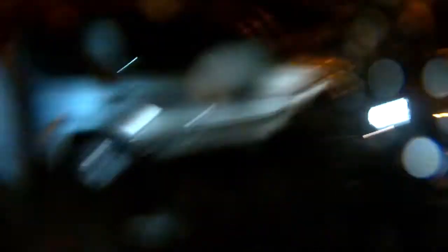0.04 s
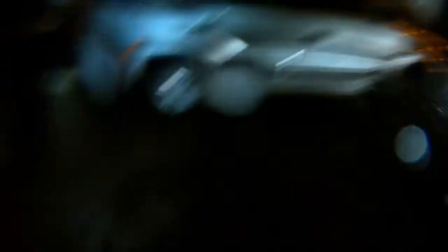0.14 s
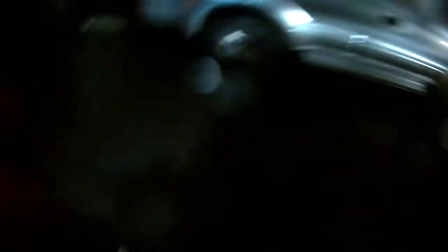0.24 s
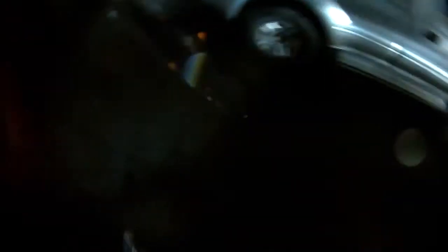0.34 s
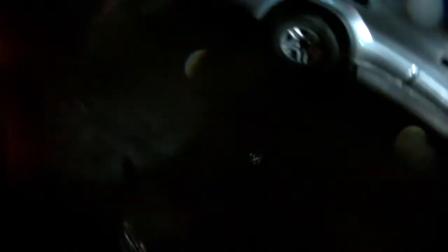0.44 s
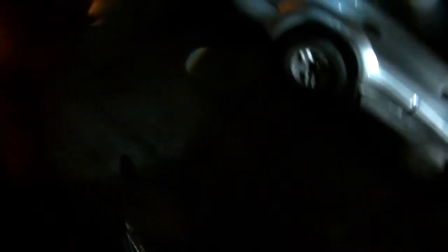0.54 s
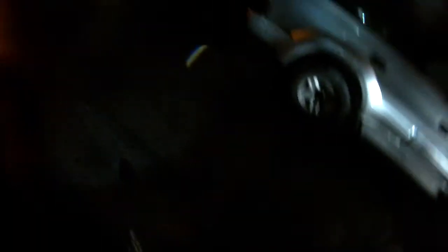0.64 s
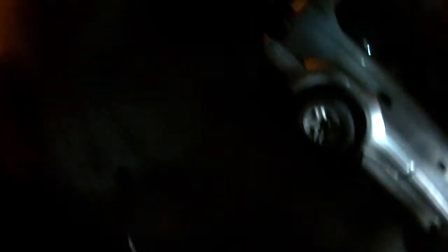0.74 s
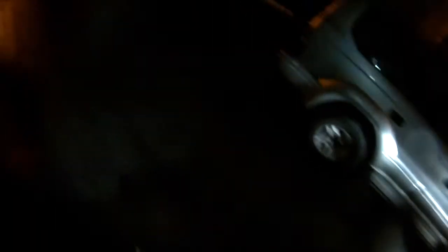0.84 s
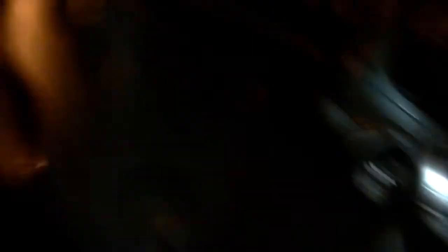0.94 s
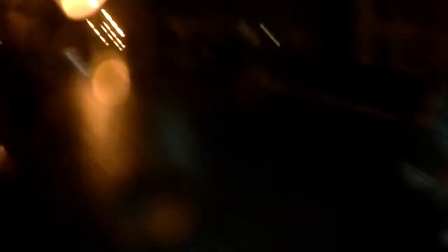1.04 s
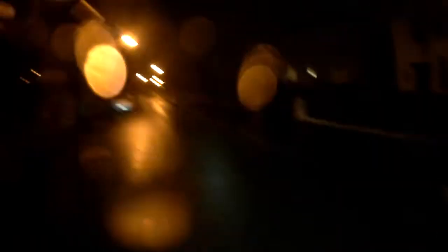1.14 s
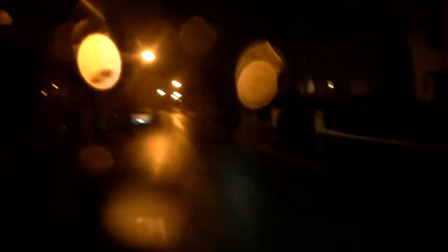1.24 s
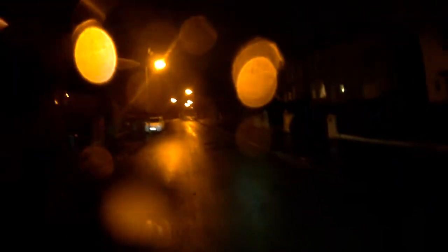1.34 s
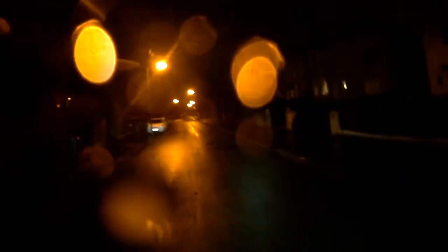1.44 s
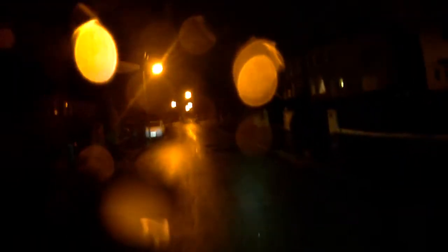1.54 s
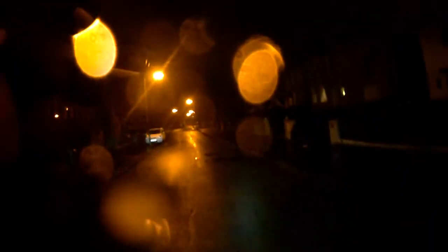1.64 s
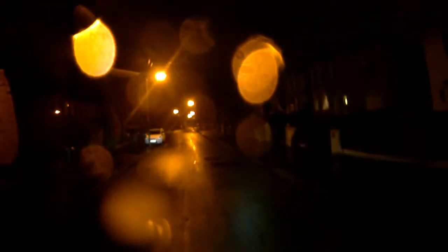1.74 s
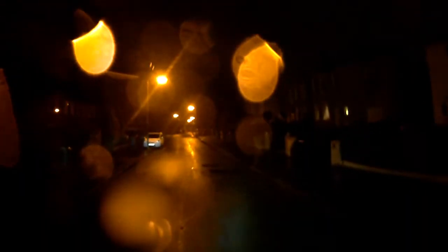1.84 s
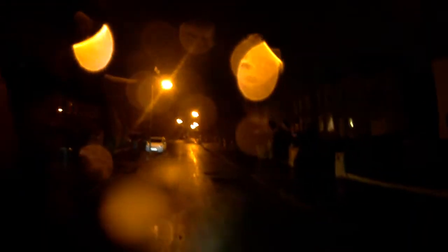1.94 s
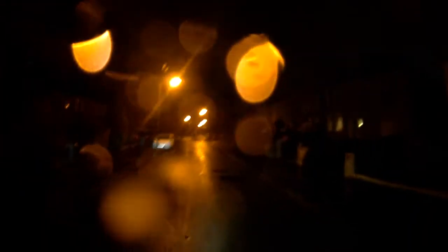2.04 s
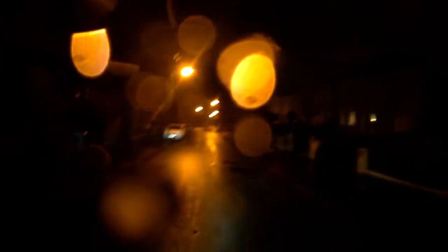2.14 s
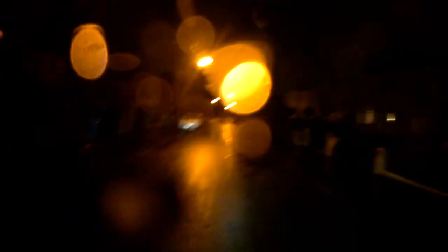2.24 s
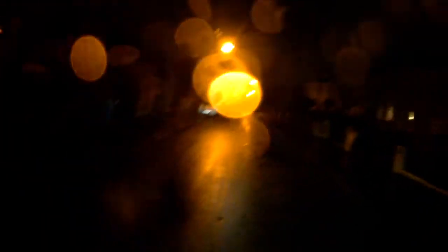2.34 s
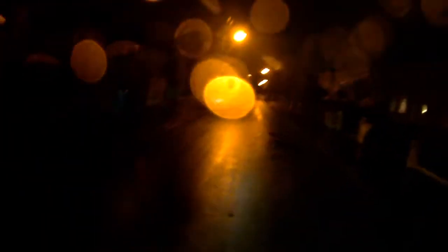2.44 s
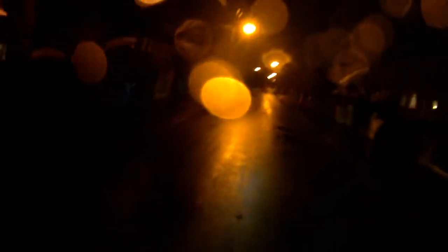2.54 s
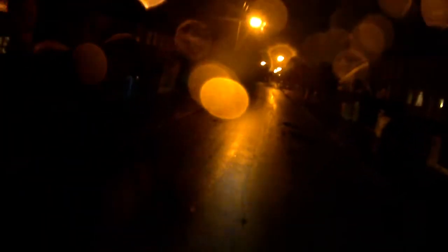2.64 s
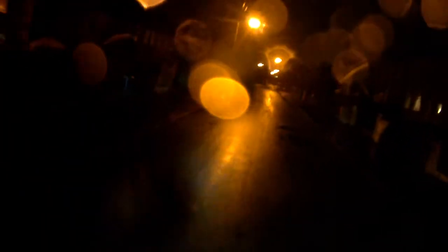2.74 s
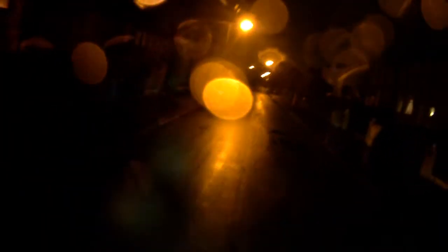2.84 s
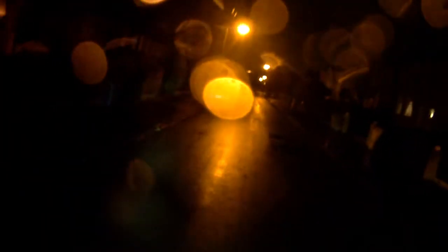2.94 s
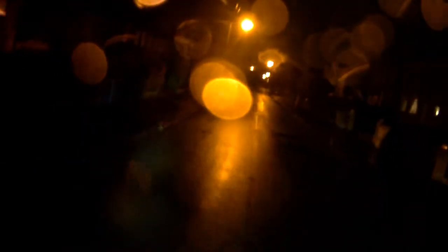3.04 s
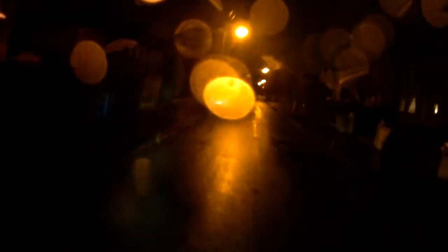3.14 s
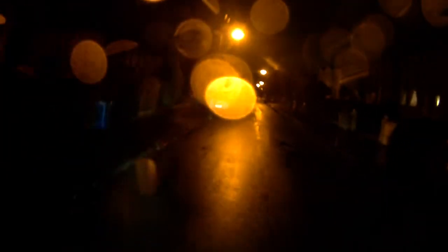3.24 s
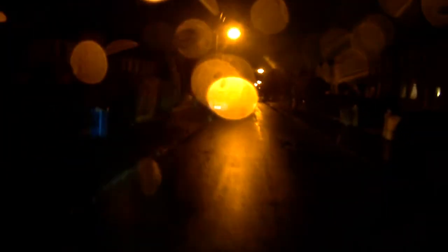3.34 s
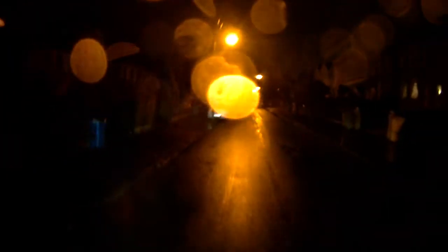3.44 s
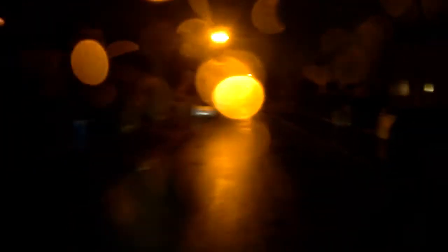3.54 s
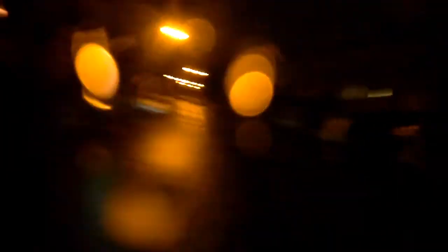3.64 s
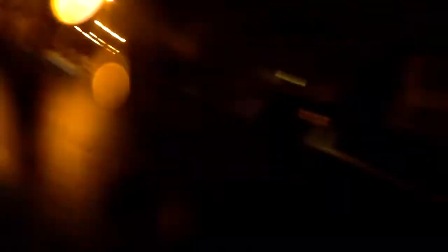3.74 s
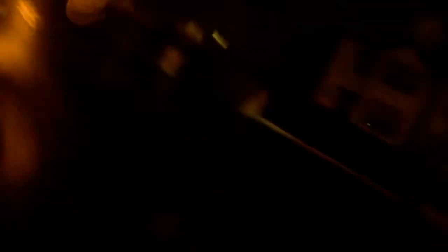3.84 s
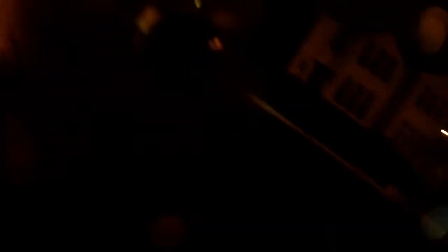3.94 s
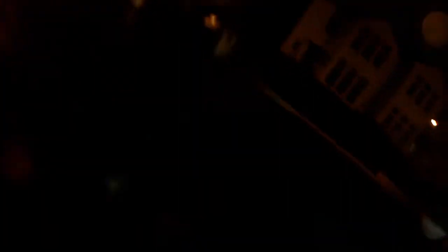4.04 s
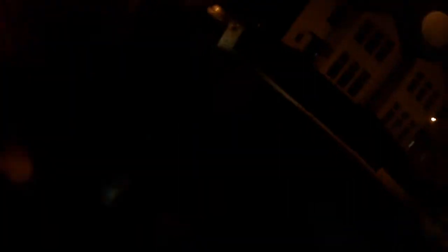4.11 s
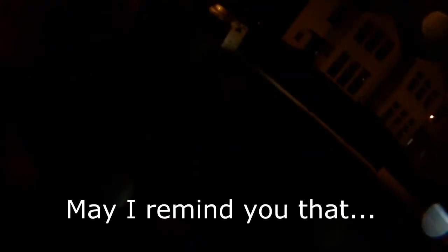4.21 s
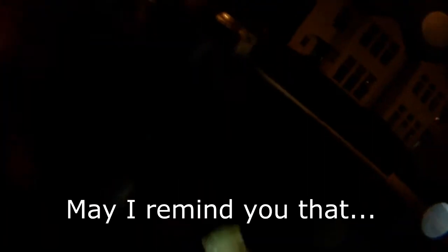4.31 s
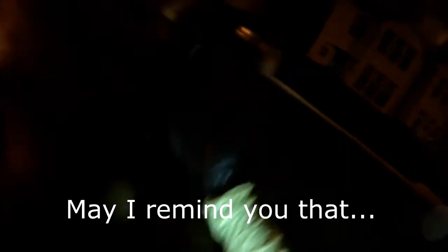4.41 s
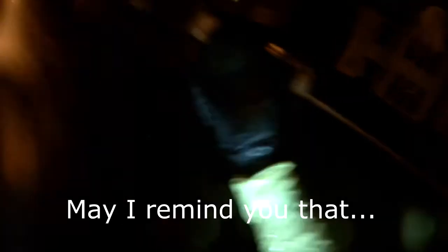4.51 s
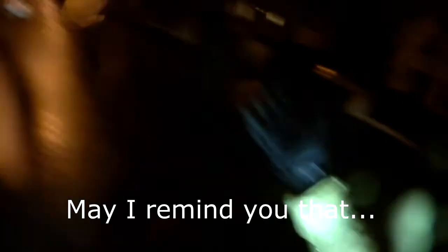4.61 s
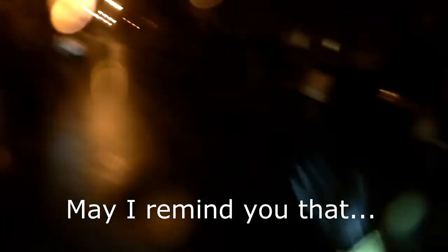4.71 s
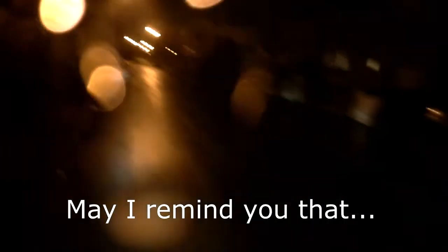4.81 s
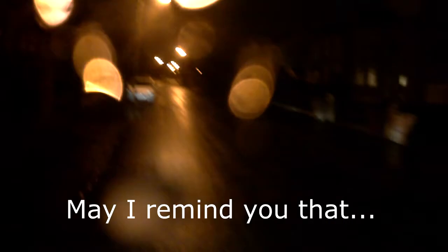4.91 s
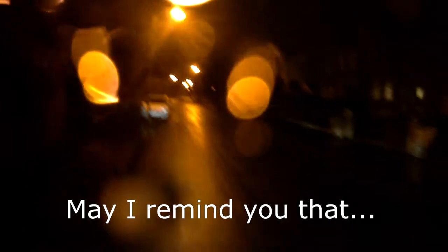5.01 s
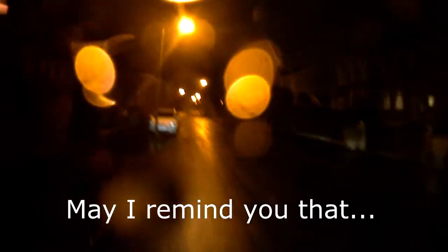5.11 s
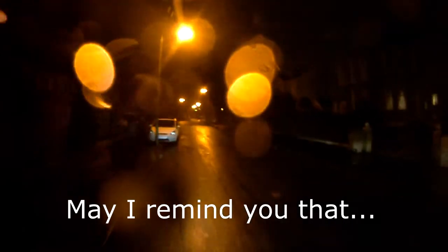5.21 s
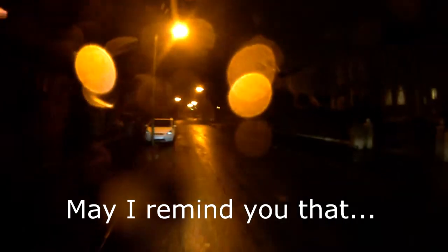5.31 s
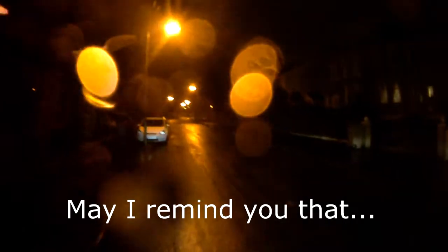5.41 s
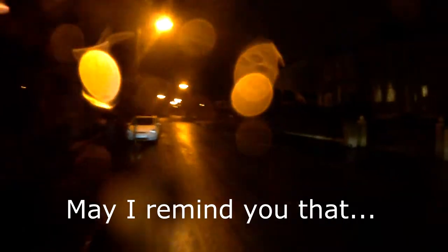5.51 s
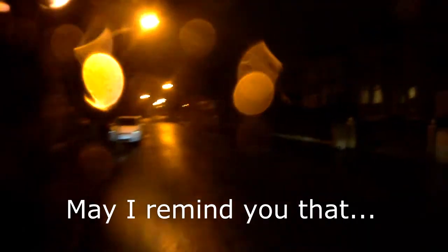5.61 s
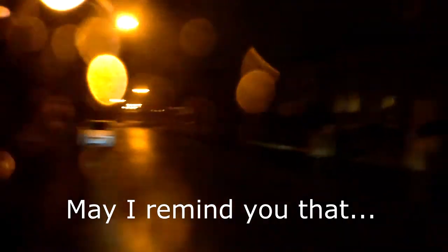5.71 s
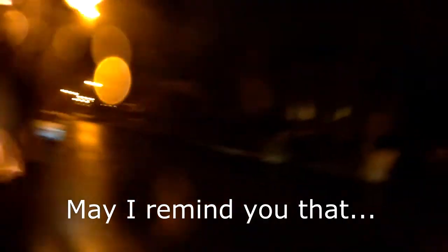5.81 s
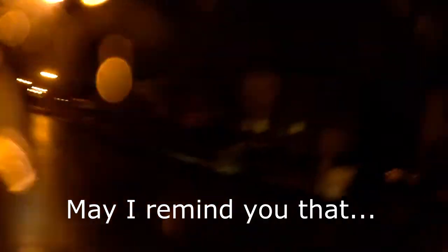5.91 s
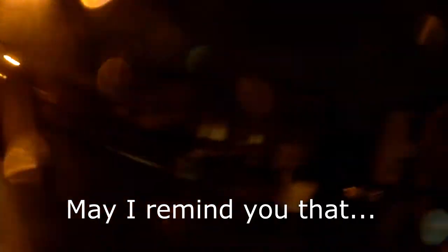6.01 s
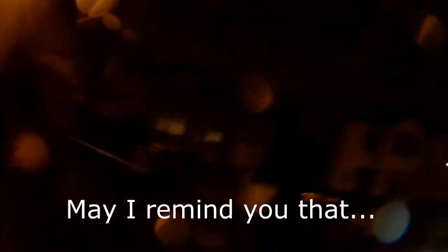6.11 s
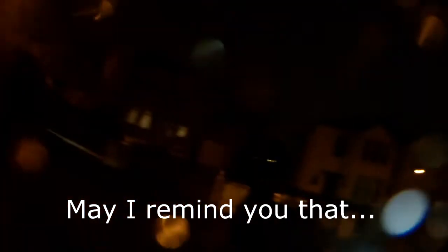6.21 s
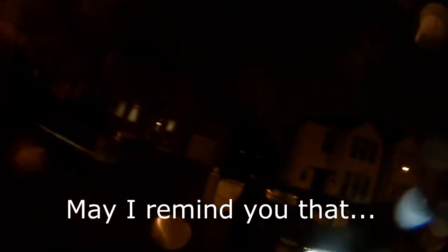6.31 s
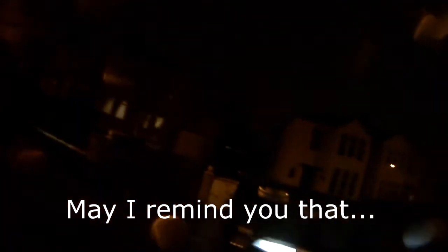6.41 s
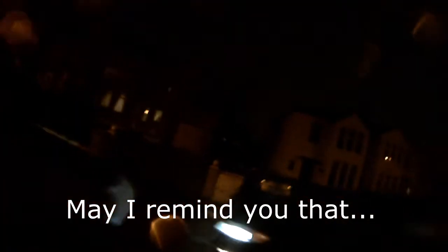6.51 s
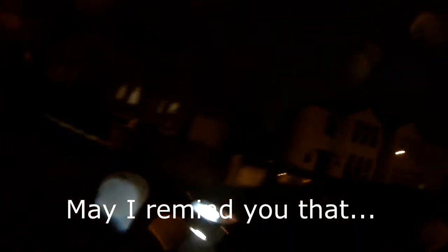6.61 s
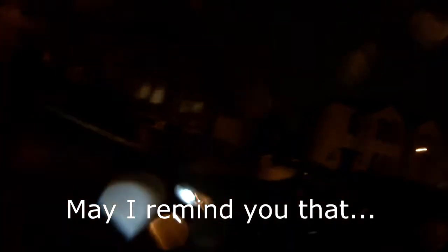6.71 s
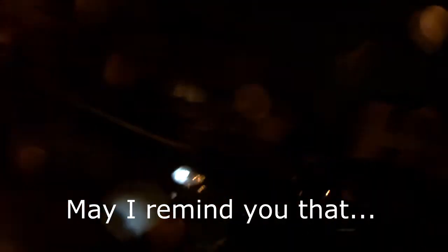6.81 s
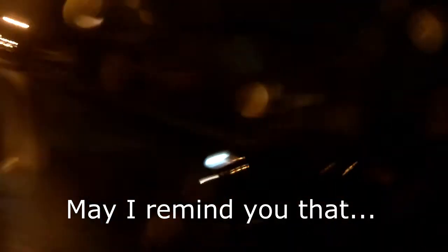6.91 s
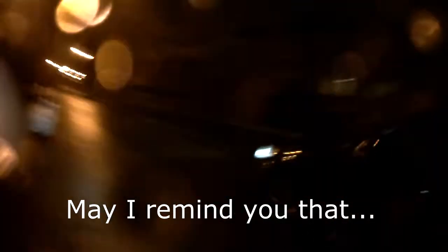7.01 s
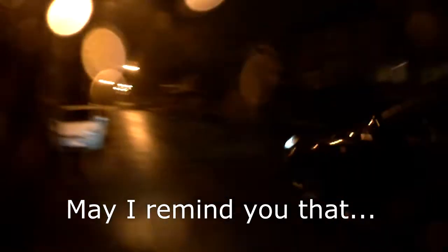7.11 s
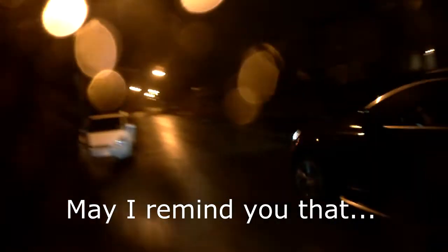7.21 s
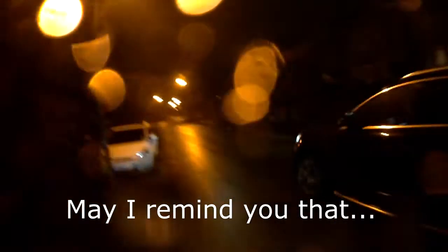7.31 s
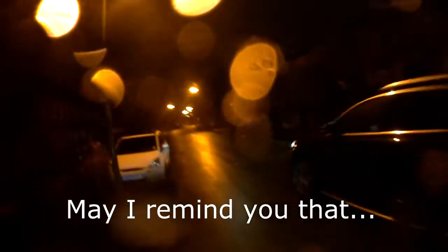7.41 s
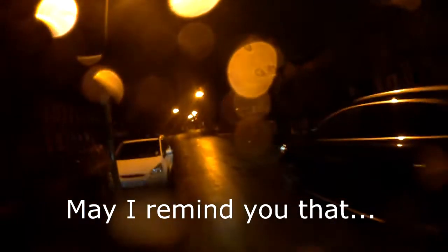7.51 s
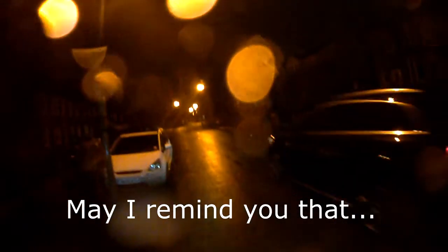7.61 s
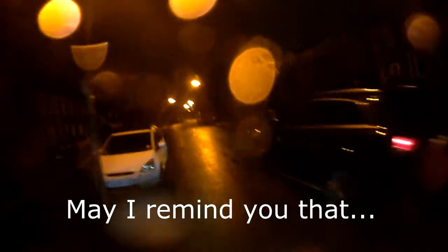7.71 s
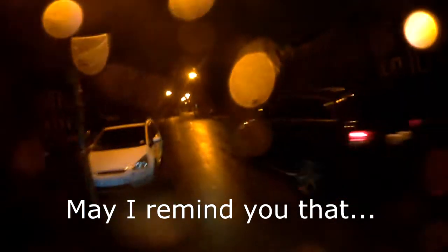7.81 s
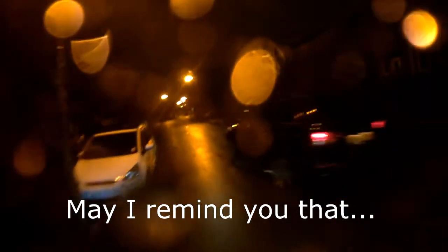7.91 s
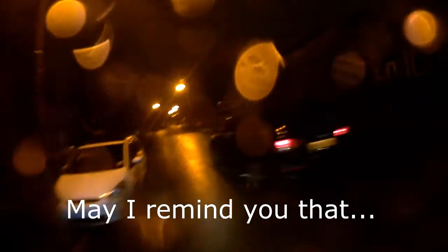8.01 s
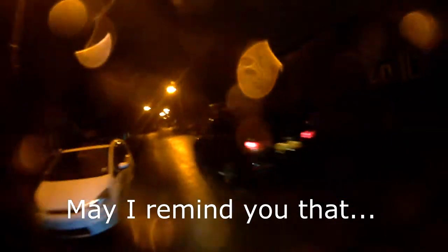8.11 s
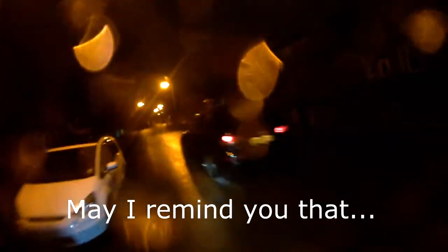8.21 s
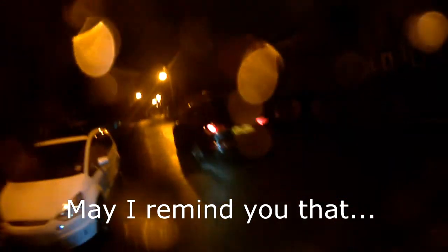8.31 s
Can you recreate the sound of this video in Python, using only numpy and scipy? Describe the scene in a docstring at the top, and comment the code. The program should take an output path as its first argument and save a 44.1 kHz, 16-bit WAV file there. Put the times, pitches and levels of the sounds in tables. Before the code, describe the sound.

Close, dry rain ticks and faint patter strike a small microphone case on a moving cyclist's helmet, over low gusty wind and soft jolts. Behind, an uneven diesel knock idles steadily, then rises into a smoother growl. Engine drone, exhaust and wet tyre hiss swell as the car draws level late on, then the engine drops slightly in pitch and fades while bright spray lingers.

```python
"""A six-cylinder diesel car idles behind a cyclist on a wet street, pulls away and overtakes. Uneven firings ring
the engine block and the exhaust pipe, over coloured tyre noise, a low drone and a wavering turbo whistle.
Spray is noise in the rings of the microphone's small case on the helmet; rain drops strike the same case.
Bumps thud through the helmet as short low cycles, and wind rumbles on the port as patchy noise."""
import sys
import numpy as np
from scipy import signal
from scipy.fft import rfft, irfft, next_fast_len
from scipy.io import wavfile
from scipy.ndimage import uniform_filter1d, map_coordinates

SR = 44100
rng = np.random.default_rng(int(sys.argv[2]) if len(sys.argv) > 2 else 0)


def ratio(d):
    """dB to gain"""
    e = np.asarray(d, float) / 20
    return 10 ** e


def persist_wave(psi):
    """Save psi, clipped to +-1, as 16-bit WAV."""
    counts = np.round(np.clip(psi, -1, 1) * 32767).astype(np.int16)
    wavfile.write(sys.argv[1], SR, np.atleast_2d(counts).T)


N = 368235
LEVEL_S, LEVEL_SPAN_S = 7.38, 0.42  # the car draws level: moment and half length


def curves(table):
    """Columns of a table, one value per sample."""
    s, *columns = np.transpose(table)
    return [np.interp(np.arange(N) / SR, s, c) for c in columns]


def unit(x):
    """Scale to rms 1."""
    return x / np.sqrt(np.mean(x ** 2))


def ring(x, hz, width_hz):
    """One resonance, gain 1 at the centre."""
    return signal.lfilter(*signal.iirpeak(hz, hz / width_hz, fs=SR), x)


def walk(rate):
    """Random levels held 1 / rate s and slewed twice; spread near 1."""
    k = int(SR / rate)
    held = np.repeat(rng.standard_normal(N // k + 1), k)
    return 1.3 * uniform_filter1d(uniform_filter1d(held, k), k)[:N]


def swell(s, half_s):
    """1 around a moment, 0 far from it."""
    return np.exp(-((np.arange(N) / SR - s) / half_s) ** 4)


def noise(colour, patchy_db, rate):
    """Coloured noise whose half-octave bands each flicker on their own."""
    size = next_fast_len(N)
    hz = np.maximum(np.arange(size // 2 + 1) * SR / size, 1)
    points_hz, db = np.transpose(colour)
    tint = ratio(np.interp(np.log(hz), np.log(points_hz), db, -90, -90))
    spectrum = rfft(rng.standard_normal(size)) * tint
    half_octave = 2 * np.log2(hz / points_hz[0])
    out = np.zeros(N)
    for k in range(int(2 * np.log2(points_hz[-1] / points_hz[0])) + 2):
        band = irfft(spectrum * np.clip(1 - abs(half_octave - k), 0, 1), size)[:N]
        out = out + ratio(patchy_db * walk(rate)) * band
    return unit(out)


# the cylinders fire unevenly:
# (knock level [dB], exhaust level [dB], exhaust lateness before scaling [share of a firing])
CYLINDER_SPREAD = [(3, 6, 0), (0.5, -2, -.06), (2.5, 0, .06), (-1.1, -3, .02), (-1.1, 0, -.07),
                   (-2, -1, .05)]


def firings(phase, column, scatter_db, late):
    """One pulse per firing, sized and delayed by its cylinder, split between two samples."""
    count = np.arange(np.ceil(phase[0]), phase[-3] - 1).astype(int)
    cylinder = np.array(CYLINDER_SPREAD)[count % len(CYLINDER_SPREAD)]
    chance = rng.standard_normal((len(count), 2))
    at = np.interp(count + late * cylinder[:, 2], phase, np.arange(N))
    at = at + 3 * chance[:, 0]  # jitter in samples
    size = ratio(cylinder[:, column] + scatter_db * chance[:, 1])
    pulses = np.zeros(N)
    np.add.at(pulses, at.astype(int), size * (1 - at % 1))
    np.add.at(pulses, at.astype(int) + 1, size * (at % 1))
    return pulses


# engine block under each knock: (centre [Hz], width of the first of two rings [Hz], mean level [dB])
BLOCK_RINGS = [(570, 70, -9), (795, 120, -1), (860, 80, -2), (940, 110, -1), (1310, 170, -1.5),
               (2200, 220, -12)]


def engine_knock(pulses, puffs, hz, steady):
    """Combustion knocks ring the block at idle; under load the whole body radiates a wide band."""
    rattle_decay = signal.lfilter([1], [1, -np.exp(-1 / (0.006 * SR))], pulses)
    rattle = rattle_decay * rng.standard_normal(N)
    blow = unit(pulses) + 0.36 * unit(rattle)
    # road and house fronts return each knock twice
    blow = blow + 0.25 * np.roll(blow, int(0.0088 * SR)) + 0.17 * np.roll(blow, int(0.0165 * SR))
    idle = np.zeros(N)
    for k, (f, width_hz, db) in enumerate(BLOCK_RINGS):
        mode = ring(ring(blow, f, width_hz), f, 1.5 * width_hz)
        idle = idle + (-1) ** k * ratio(db + 2.5 * walk(4)) * mode
    idle = unit(steady * idle)
    pull = unit(steady * ring(ring(unit(pulses) + 0.64 * puffs, 780, 980), 940, 800))
    load = np.clip((hz - hz[0]) / 45, 0, 0.85)
    return np.sqrt(1 - load) * idle + np.sqrt(load) * pull


# roar of tyres on wet tar: (frequency [Hz], relative density [dB per Hz])
TYRE_COLOUR = [(150, -27), (300, -5), (480, -5.5), (700, -2.5), (1000, -3), (1350, -3), (1650, -11),
               (2200, -12), (2900, -34.5), (3500, -25), (5000, -36)]


def tyre_roar():
    """Tyres on wet tar: broadband noise whose bands flicker."""
    return noise(TYRE_COLOUR, patchy_db=1.7, rate=14)


# firing harmonics that stand out for a while as the paths to the ear change:
# (multiple of the firing rate [ratio], time [s], half length [s], mean peak against the clatter rms [dB])
STANDOUT_HARMONICS = [(10, 3.4, .2, -10), (11, 3.45, .25, -7), (9, 3.6, .22, -10), (7.5, 3.65, .2, -8),
                      (3, 3.55, .35, -12), (8, 4.2, .17, -8), (9, 4.3, .28, -7), (10, 4.22, .12, -8),
                      (4 / 3, 4.5, .1, -10), (7.5, 4.48, .12, -9), (9, 5.0, .28, -5), (8, 5.45, .35, -10),
                      (7, 5.6, .58, -6), (6, 5.4, .2, -8), (11.5, 5.7, .35, -10), (28 / 3, 5.8, .2, -8),
                      (6, 6.03, .25, -3), (5, 6.35, .45, -13), (7.5, 6.72, .25, -8.5), (6, 6.95, .25, -10),
                      (1, 7.0, .2, -14), (25 / 3, 7.0, .3, -11)]


def standout_harmonics(phase):
    """Sines locked to the firing, each swelling around its own moment."""
    shaky = phase + 0.012 * walk(10)  # the car's distance never changes quite evenly
    out = np.zeros(N)
    for multiple, s, half_s, db in STANDOUT_HARMONICS:
        level = swell(s, half_s) * ratio(db + 1.8 * walk(12))
        out = out + level * np.sin(2 * np.pi * multiple * shaky)
    return out


def exhaust(puffs, steady):
    """Gas pulses and rushing noise ring the pipe near 380 Hz."""
    rush = 0.45 + 0.5 * np.clip(np.arange(N) / SR - 6.2, 0, 1)  # rougher off throttle
    gas = puffs * ratio(1.2 * walk(35)) + rush * rng.standard_normal(N)
    return unit(steady * ring(ring(gas, 381, 92), 375, 87))


def exhaust_drone(phase, hz):
    """A tone at twice the firing rate that sets in once its pitch nears the pipe's low resonance."""
    tone = np.sqrt(2) * np.sin(2 * np.pi * 2 * phase + 0.55 * walk(25))
    onset = np.clip((hz - 55) / 25, 0, 1)
    return onset * ratio(1.5 * walk(30)) * tone


# idle, pull-away, a gear change, lift-off: (time [s], firing rate [Hz])
FIRING_RATE = [(0, 38.92), (2.42, 38.92), (3, 56), (3.25, 66.6), (3.5, 74.3), (3.75, 77.8), (4.1, 85.2),
               (4.65, 98), (4.8, 107), (4.9, 109), (5.12, 108), (5.3, 111.3), (5.57, 118.7), (5.75, 121),
               (6, 121.7), (6.25, 121.3), (6.4, 119), (6.7, 117.2), (7.1, 116.8), (7.35, 118.3),
               (7.6, 117.8), (7.8, 115.4), (8.05, 109), (8.35, 104)]
# mix of the car:
# (time [s], clatter and tyre level [dB], exhaust level [dB], drone level before its onset and flicker [dB])
CAR_LEVELS = [(0, -47, -62, -70), (.75, -48.5, -62.5, -70), (1.6, -47.5, -65, -70), (2.3, -51.5, -68, -70),
              (3.05, -48, -74, -66), (3.5, -45, -80, -61), (3.93, -45, -67, -67), (4.33, -44, -55, -53),
              (4.72, -44.5, -62, -68.5), (5.58, -36.5, -44, -49.5), (6.12, -37, -41, -53.5),
              (6.49, -36, -37.5, -43.5), (6.85, -35, -40, -49.5), (7.15, -34.5, -43.5, -48),
              (7.56, -35.5, -37.5, -38), (7.92, -38, -49, -40), (8.15, -40, -55, -57.5),
              (8.35, -42.5, -56, -74)]


def car():
    """Knocks ring the block, gas pulses ring the pipe, the tyres roar on wet tar."""
    first_phase = 2.83  # firings
    knock_idle, knock_moving, knock_fade_hz = 0.56, 0.17, 19  # power shares; rise of firing rate that thins it
    hz, = curves(FIRING_RATE)
    level_db, exhaust_db, drone_db = curves(CAR_LEVELS)
    phase = first_phase + np.cumsum(hz) / SR
    steady = 1 / np.sqrt(hz)  # faster firing carries more energy; the levels are stated apart from it
    pulses = firings(phase, column=0, scatter_db=1.4, late=0)
    puffs = unit(firings(phase, column=1, scatter_db=5.0, late=0.97))
    knock = engine_knock(pulses, puffs, hz, steady)
    share = knock_moving + (knock_idle - knock_moving) * np.exp((hz[0] - hz) / knock_fade_hz)
    share = np.clip(share, 0, 1)
    body = np.sqrt(share) * knock + np.sqrt(1 - share) * tyre_roar()
    body = body + standout_harmonics(phase)
    pipe = exhaust(puffs, steady)
    drone = exhaust_drone(phase, hz)
    return ratio(level_db) * body + ratio(exhaust_db) * pipe + ratio(drone_db) * drone


def turbo():
    """A thin wavering whistle: its pitch climbs to a peak, then sags as the turbine slows."""
    start_s, peak_s, end_s, fade_s, sag_s = 5.25, 5.75, 7.85, 0.4, 1.1
    start_hz, peak_hz, hold_hz = 11000, 12400, 11500
    s = np.arange(N) / SR
    rise = np.sin(np.pi / 2 * np.clip((s - start_s) / (peak_s - start_s), 0, 1))
    climb = start_hz + (peak_hz - start_hz) * rise
    sag = hold_hz + (peak_hz - hold_hz) / np.cosh((s - peak_s) / sag_s * 2)
    hz = np.where(s < peak_s, climb, sag)
    on = np.clip(np.minimum(s - start_s, end_s - s) / fade_s, 0, 1)
    # the whistle gains 3 dB as the car draws level
    db = -72 + 3 * swell(LEVEL_S, LEVEL_SPAN_S) + 2.5 * walk(25)
    return on * ratio(db) * np.sin(2 * np.pi * np.cumsum(hz + 110 * walk(300)) / SR)


# fine mist, nearly flat up to an overall upper limit near 15.3 kHz:
# (frequency [Hz], relative density [dB per Hz])
MIST_COLOUR = [(5000, -49), (7500, 2), (8300, -2), (10000, -3), (11000, -3.5), (12000, -2.5), (15200, -5),
               (15450, -26)]


def mist(spray_db, side):
    """Fine mist and, under it, steady rain: one treble noise whose bands flicker."""
    fade_db_per_s, rain_db = 7, -74.5
    # the mist thins as the car draws away
    away_s = np.maximum(np.arange(N) / SR - LEVEL_S, 0)
    mist_db = spray_db - 14.5 + 7.5 * side - fade_db_per_s * away_s
    return np.hypot(ratio(mist_db), ratio(rain_db)) * noise(MIST_COLOUR, patchy_db=2.2, rate=5)


# spray over time: (time [s], spray level [dB], how far it comes from beside the port [0-1],
# 2.2 kHz tyre ring level [dB], 1.7 kHz ring level [dB], 5.6 and 8.8 kHz rings' extra against the spray [dB])
SPRAY_LEVELS = [(0, -66.5, .64, -68, -66, -0.5), (.91, -75, 0.84, -65, -68, 1.5),
                (1.08, -69, 0.5, -53, -56, -2), (1.35, -67.5, 0.5, -58, -55, 0),
                (1.75, -66.5, 0.4, -52.5, -57, 0), (1.95, -68, 0.4, -60, -59, -0.5),
                (2.46, -70, 0.4, -56.5, -57, -1), (2.8, -69, 0.2, -60, -54, -1),
                (3.1, -72, .1, -63, -51.5, -4), (3.3, -69, 0, -58, -48, -1), (3.65, -66, 0, -61, -53, 2),
                (4.14, -70, 0.55, -55, -56, 1), (4.33, -65, 0.78, -56.5, -61, -0.5),
                (4.72, -68, 0.4, -50.5, -51, 5), (4.88, -57.5, 0, -52, -49.5, -9),
                (5.1, -56, 0.05, -49, -44, 0.5), (5.72, -54.5, 0, -47, -46, -1),
                (5.92, -57, 0.55, -47.5, -45, 5), (6.14, -57.5, 0.83, -43, -72, -4),
                (6.44, -58, 0.96, -55, -67, 3), (6.88, -54, 0.93, -44, -54, 1.5),
                (7.05, -53.5, 0.93, -53, -44, -0.5), (7.32, -53, 0.87, -65, -59, -4),
                (7.7, -54.5, 0.86, -54, -51, -2), (8.0, -56, 0.8, -81, -56, -1.5),
                (8.35, -57, 0.85, -66, -49.5, 1)]
# rings of the case under spray: (centre [Hz], width of the first of two rings [Hz])
HISS_RINGS = [(4550, 620), (5600, 700), (6640, 500), (2850, 560), (3600, 600), (8800, 800), (9700, 1300),
              (4100, 380), (2170, 300), (1700, 420)]
# the first eight of those rings, in order: (level against the spray from ahead [dB], gain from beside [dB])
HISS_RING_LEVELS = [(1, -2.5), (-0.5, 1), (-3, -2.5), (1.5, 0.5), (-22, 25.5), (-15, -3), (-22, 7.5),
                    (-8, 7.5)]
# single case rings that swell or dip as the head turns and the car draws level:
# (centre [Hz], time [s], half length [s], level change [dB])
RING_SWELLS = [(9700, 6.1, .26, 8), (9700, 6.57, .14, -4), (9700, 7.15, .4, 4), (4100, 6.9, .2, 3),
               (6640, 7.38, .42, 6.5)]


def spray():
    """Water thrown by tyres, heard through the resonances of the case."""
    spray_db, side, tyre_db, low_db, extra_db = curves(SPRAY_LEVELS)
    side = np.clip(side, 0, 1)
    rings_db = [spray_db + ahead_db + side_db * side for ahead_db, side_db in HISS_RING_LEVELS]
    rings_db = rings_db + [tyre_db, low_db]
    for k in (1, 5):  # 5.6 and 8.8 kHz
        rings_db[k] = rings_db[k] + extra_db
    out = mist(spray_db, side)
    for (hz, width_hz), db in zip(HISS_RINGS, rings_db):
        band = ring(ring(rng.standard_normal(N), hz, width_hz), hz, 1.3 * width_hz)
        # small head movements slide each ring by a few percent
        band = map_coordinates(band, [np.cumsum(1 + 0.012 * walk(2.5))], order=1, mode="wrap")
        for swell_hz, s, half_s, up_db in RING_SWELLS:
            if abs(swell_hz / hz - 1) < 0.06:
                db = db + up_db * swell(s, half_s)
        out = out + ratio(db + 1.44 * walk(12) + 0.38 * walk(3.24)) * unit(band)
    return out


def case_shadow(street):
    """The case dims a band around 3.5 kHz for sound from ahead."""
    ahead = 1 - np.clip(curves(SPRAY_LEVELS)[1], 0, 1)
    return street - 0.6 * ahead * ring(street, 3500, 550)


# what a drop rings in the case: (centre [Hz], t60 of a hard drop [s], base level [dB])
CASE_RINGS = [(425, 0.012, 14.5), (810, 0.003, 24.5), (1280, 0.0033, 24), (2670, 0.0057, 3),
              (3450, 0.0054, -5), (4500, 0.0024, 8), (5340, 0.0017, 9), (6420, 0.0027, -1.5),
              (9500, 0.0016, 13), (11800, 0.0044, 0), (14200, .004, -17)]


def drop_hit(t, peak_db, own_hz, low_db, fall_db, u):
    """One drop: decaying case modes, strongest near its own pitch, and a second strike as it breaks up."""
    low_fall = 0.15  # share of the fall that also dims the lowest rings
    splash_s, splash_db = 0.0014, -9  # the drop strikes again within this time
    hz, t60, db = np.array(CASE_RINGS, float).T[:, :, None]
    soft = max(fall_db / 9, 1)  # a soft drop rises and rings longer on one pitch
    away = abs(np.log2(hz / own_hz))  # octaves
    near_db = -fall_db * (away - away.min())
    # the top rings grow more slowly than the drop
    top_db = -13.5 - 0.32 * max(peak_db + 34, -15) - fall_db
    bottom_db = low_db - low_fall * fall_db * np.log2(hz[2] / hz)
    mode_db = db + np.where(hz < 2000, bottom_db, np.where(hz > 8000, top_db, near_db))
    # every drop lands elsewhere on the case
    gain = ratio(mode_db) * ratio(4 * (u[::-1] - 0.5))
    build_up = 1 - np.exp(-t * hz / 0.45 / soft)  # low modes take longer
    decay = np.exp(-np.log(1000) * t / t60 / np.sqrt(soft))
    tuned = np.where(away == away.min(), own_hz, hz)  # the water pulls the nearest mode to its own pitch
    tuned = tuned * (1 + 0.05 * (u - 0.5))
    modes = gain * build_up * decay * np.sin(2 * np.pi * (tuned * t + 0.1 * u))
    hit = modes.sum(axis=0)
    return hit + ratio(splash_db) * np.interp(t - splash_s * (1 + u[0]) / 2, t, hit, 0)


# single drops: (time [s], strike level [dB], strongest ring [Hz], low ring level [dB],
# fall of the other rings [dB per octave])
DROP_HITS = [(0.1717, -33.5, 4430, -18, 10), (1.0605, -47, 6800, -13, 11), (1.1968, -41, 6390, -20, 9),
             (1.2147, -32.5, 1520, -10.5, -1.5), (1.6984, -39.5, 4500, -1, 16),
             (1.8203, -33.5, 4470, -10, 18), (1.9, -27.5, 6200, -33, 8.5), (2.1275, -27, 4890, -19.5, 0),
             (2.4685, -45, 4900, 12, 20), (2.5346, -24, 4520, -22, 4), (2.6466, -14, 4580, -24.5, 16),
             (2.6788, -39, 4300, -12, -1), (2.7113, -46, 4600, -25, 25), (2.804, -35.5, 4840, -12, 2),
             (2.9699, -41, 4090, -4, 13), (3.0658, -41.5, 4050, -24, 26), (3.2505, -43, 4800, -20, 20),
             (3.5145, -34.5, 2930, -7.5, 12), (3.643, -38, 4400, -8.5, 12),
             (3.8731, -12.5, 4740, -19.5, 10), (3.8914, -38, 4480, -3, 11), (4.1984, -25.5, 4360, -12.5, 7),
             (4.2205, -28, 3820, -13, 10), (4.429, -34.5, 3180, -13, 9), (4.912, -33.5, 4500, -14, 0),
             (5.1011, -33, 4600, -10, 9), (5.4962, -35, 4700, -15, 12), (5.9868, -27, 4540, -28, 33),
             (6.0604, -33, 3000, -16, 0), (6.0805, -29, 4400, -10, 4), (6.2065, -31, 4520, -7, 8),
             (6.55, -28, 4350, -25, 34), (6.6069, -32, 3410, -24, 7), (7.738, -28.5, 5230, -31, 2),
             (8.2589, -33, 5470, -26, 3)]


def drops(small_db=-59, spread_db=3.5, top_db=-49):
    """Each drop rings the case modes, most near its own pitch; faint ones fall at random."""
    faint = []
    for u, v, w in rng.random((int(N / SR * 45), 3)):  # 45 per second
        strike_db = min(small_db - spread_db * np.log(v), top_db)
        faint.append((u * N / SR, strike_db, 3500 + 3000 * w, -14, 20))
    rows = list(DROP_HITS) + faint
    chance = rng.random((len(rows), len(CASE_RINGS), 1))
    t = np.arange(int(0.03 * SR)) / SR
    out = np.zeros(N + len(t))
    for (s, peak_db, own_hz, low_db, fall_db), u in zip(rows, chance):
        i = int((s + 0.0004) * SR)
        out[i:i + len(t)] -= ratio(peak_db) * drop_hit(t, peak_db, own_hz, low_db, fall_db, u)
    # the case weakens a band around 8.4 kHz
    out = out[:N] - 0.37 * ring(out[:N], 8400, 1800)
    # the very top of each drop is rolled off above 14.8 kHz
    return signal.sosfilt(signal.butter(6, 14800, fs=SR, output="sos"), out)


# jolts: (time [s], envelope peak [dB], pitch [Hz], knock level against that peak, before its decay [dB])
BUMP_HITS = [(0.049, -32, 332, -17), (0.104, -34.5, 188, -3), (0.197, -46, 91.5, -1.5),
             (0.788, -44, 190, -19), (1.05, -38.5, 203, -22), (1.302, -36.5, 302, -18),
             (1.379, -33, 340, -14), (1.478, -40, 396, -19), (1.777, -43.5, 231, -3),
             (1.975, -39, 108, 0.5), (2.685, -35, 180, -8), (2.733, -35, 67.3, -30), (2.829, -39, 64, -9),
             (3.1, -41, 62, -26), (3.149, -36, 405, -20), (3.468, -35, 440, -12), (3.669, -35, 200, -19),
             (3.96, -34, 194, -21), (4.092, -34, 290, -8), (4.684, -37, 302, -6), (4.717, -43.5, 60, -22)]


def bumps():
    """Soft jolts through the helmet: a few low cycles and a short knock of 180-620 Hz noise."""
    t = np.arange(int(0.12 * SR)) / SR
    knock_band = signal.butter(2, [180, 620], "band", fs=SR)
    grit = signal.lfilter(*knock_band, rng.standard_normal((len(BUMP_HITS), len(t))))
    out = np.zeros(N + len(t))
    for (s, peak_db, hz, knock_db), g in zip(BUMP_HITS, grit):
        x = t * hz / 0.45  # the envelope peaks after 0.45 cycles
        thud = np.e * x * np.exp(-x) * np.sin(2 * np.pi * hz * t)
        knock = ratio(knock_db) * unit(g) * np.exp(-t / 0.014)
        i = int((s + 0.008) * SR)
        out[i:i + len(t)] += ratio(peak_db) * (thud + knock)
    return out[:N]


# gusts: (time [s], deep buffeting level [dB], flutter level [dB])
WIND_LEVELS = [(0, -54, -55.5), (.35, -59, -62), (.52, -62.5, -67), (1.05, -51.5, -53), (1.21, -63, -61),
               (1.56, -60, -58), (1.88, -65, -64), (2.54, -66, -62.5), (2.74, -61, -56),
               (3.2, -65.5, -62.5), (3.8, -64, -58), (4.11, -54, -47), (4.3, -62, -43), (4.42, -55, -53.5),
               (4.86, -64.5, -58), (6.2, -61.5, -54), (6.45, -59, -39), (6.91, -59, -50.5),
               (8.35, -60, -49)]
# deep buffeting: (frequency [Hz], relative density [dB per Hz])
BUFFET_COLOUR = [(15, -4.5), (28, -6), (60, -4), (95, -4), (140, -5)]
# flutter: (frequency [Hz], relative density [dB per Hz])
FLUTTER_COLOUR = [(60, -30), (110, -17), (180, -12), (300, -13), (480, -35)]


def wind():
    """Gusty pressure on the microphone port: two patchy low noises."""
    buffet_db, flutter_db = curves(WIND_LEVELS)
    buffet = noise(BUFFET_COLOUR, patchy_db=3.0, rate=15)
    flutter = noise(FLUTTER_COLOUR, patchy_db=5.0, rate=17)
    return ratio(buffet_db) * buffet + ratio(flutter_db) * flutter


def scene():
    """All sources at the one microphone."""
    street = case_shadow(car() + turbo() + spray())
    return (street + drops() + bumps() + wind())[None]


def top_cut(x):
    """Nothing passes above the cut-off."""
    return signal.sosfilt(signal.butter(12, 16500, fs=SR, output="sos"), x)


def record(dry):
    """The finished mix, as it is kept."""
    return top_cut(dry)


dry = scene()
out = record(dry)
persist_wave(out)
```